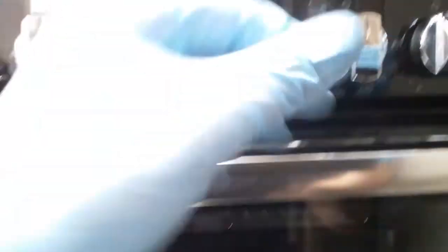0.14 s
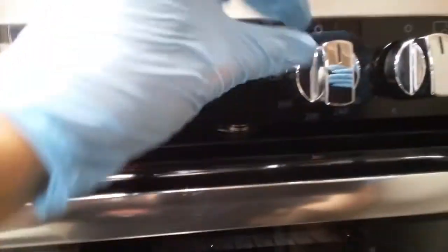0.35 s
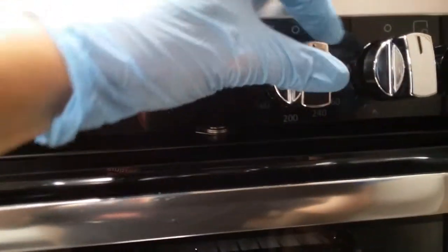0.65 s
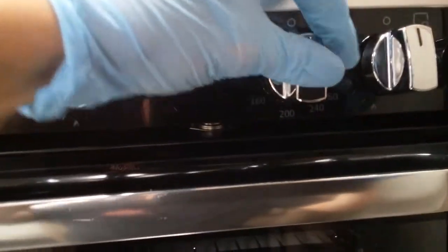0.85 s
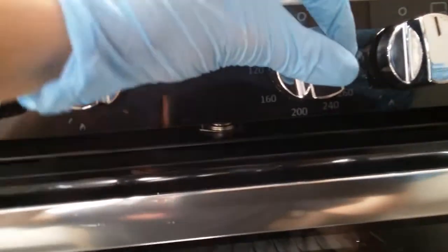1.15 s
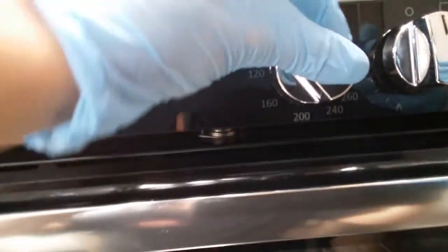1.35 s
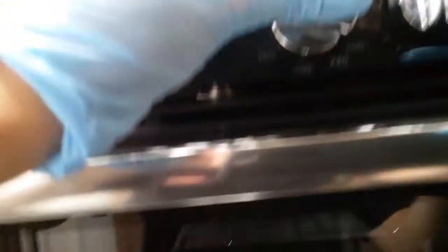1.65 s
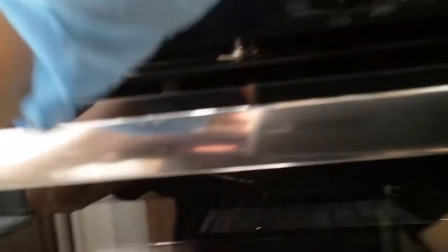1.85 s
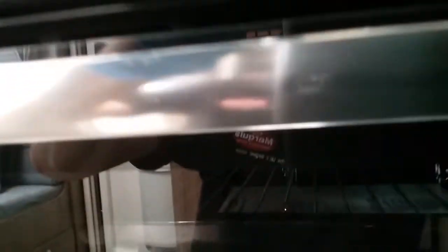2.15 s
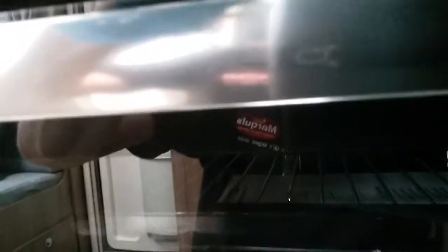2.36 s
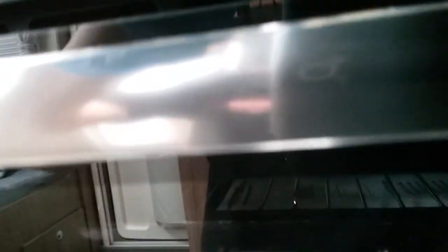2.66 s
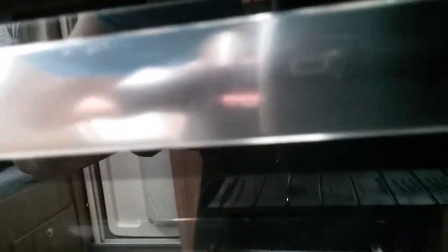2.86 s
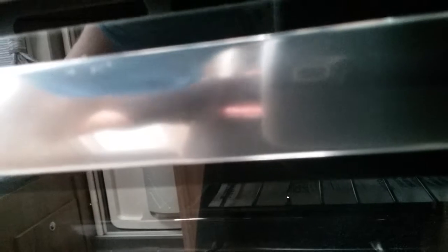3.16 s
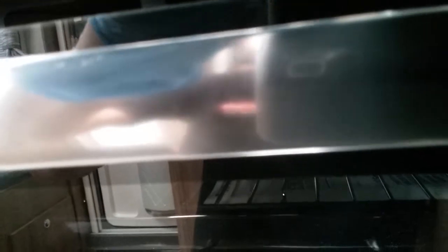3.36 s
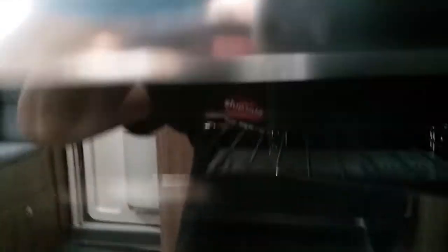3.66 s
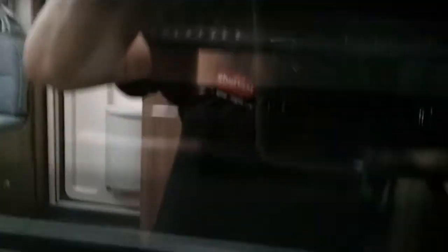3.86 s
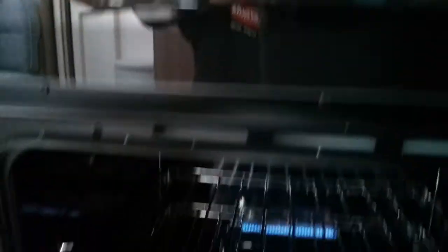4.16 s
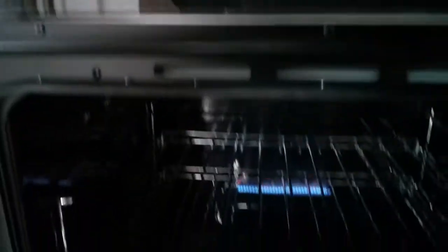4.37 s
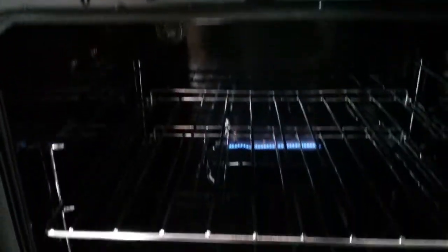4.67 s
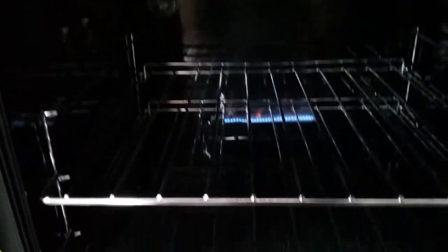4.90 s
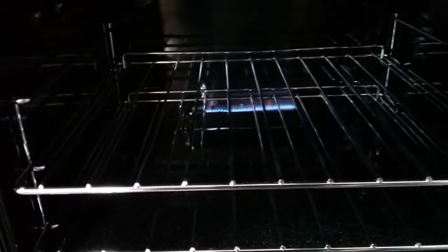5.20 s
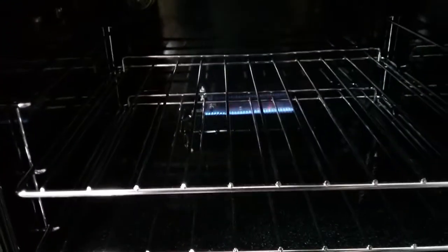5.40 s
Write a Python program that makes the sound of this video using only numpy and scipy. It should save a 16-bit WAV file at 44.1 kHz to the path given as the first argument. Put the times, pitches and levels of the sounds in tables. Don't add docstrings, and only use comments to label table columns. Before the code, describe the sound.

A close, dry phone-microphone scene in a small caravan kitchen. A quiet low outdoor wash and a very faint, extremely high steady whine lie underneath. From 0 to 1.8 seconds a gloved hand works an oven knob: small plastic ticks, fingertip taps, soft rubber rubbing, a faint squeak, and a strongest click with a dull panel knock near 0.93. Small trim pings come at 1.6 and 1.73, then near quiet with two faint ticks. From 2.75 to 3.5 five loud, bright igniter snaps, about 0.18 apart, the second doubled, ring briefly in the steel box, with soft gas pops after the first three. The burner catches around 3.1; its low, hollow, fluttering roar and thin hiss grow, opening out as the door drops near 3.8, with a slight scuff at 4.0. Irregular tiny metal ticks crackle over it until a rack clacks at 5.47.

```python
import sys
import numpy as np
from scipy import signal
from scipy.fft import rfft, irfft, next_fast_len
from scipy.io import wavfile
from scipy.ndimage import uniform_filter1d

SR = 44100
rng = np.random.default_rng(int(sys.argv[2]) if len(sys.argv) > 2 else 0)


def dump_mix(stems):
    frames = np.atleast_2d(stems).T
    limited = np.clip(frames, -1, 1)
    pcm = np.round(limited * 32767).astype(np.int16)
    wavfile.write(sys.argv[1], SR, pcm)


def decibels_to_gain(level_db):
    exponent = np.asarray(level_db, float) / 20
    return 10 ** exponent


N = 244314
TIME = np.arange(N) / SR

SPARK_TIMES = [
    2.7561,
    2.9366,
    2.9490,
    3.1150,
    3.2918,
    3.4690,
]
# peak level/dB, decay factor, likeness to the echo before (0-1), gain below 4 kHz/dB
SPARKS = [
    (-8, 1.1, 0.1, -0.5),
    (-12.5, 0.91, 1, -3.5),
    (-14, 1.14, 0.25, 1.5),
    (-8, 1.14, 0, 0.5),
    (-8, 0.93, 0.27, -2.5),
    (-6, 0.88, 1, -2),
]
# f/Hz, level/dB
SPARK_COLOUR = [(300, -26.5), (800, -8.5), (1500, -9.5), (2200, -5), (3200, -4.5), (4300, -6), (4900, -4.5),
                (5700, 0.5), (7000, 3), (9000, 4.5), (11000, 4.5), (13500, 3.5), (15500, 4)]
# f/Hz, t60/s
STEEL_BOX = [(500, 0.18), (1300, 0.13), (3500, 0.14), (6200, 0.12), (9000, 0.11), (16000, 0.1)]
# f/Hz, level/dB, t60/s
SHELF = [(2850, -15, .32), (3950, -16, .15), (4200, -18, .2), (4700, -9, .09), (5000, -8, .1),
         (5250, -8, .12), (5543, -8, .14), (5679, -8, .14), (5756, -9, .15), (5900, -7, .12),
         (6039, -7, .12), (6225, -2, .11), (6630, -3, .11), (6900, -5, .11), (7303, -9, .11),
         (7979, -10, .1)]
# f/Hz, level/dB, t60/s
ELECTRODE = [(4690, -15, 0.0081), (5000, 2.5, 0.026), (5500, 4.5, 0.0092), (5900, 3, 0.0087),
             (6640, -1.5, 0.018)]

# t/s, level/dB, relative boom/dB, relative crack/dB
POPS = [
    (2.7598, -29.5, 1, -1),
    (2.9398, -25, 5, 9),
    (3.1195, -29.5, 11, 10),
    (3.146, -36, 11, 10),
]
# f/Hz, level/dB, t60/s
POP_BOX = [(72, -19.5, 0.31), (195, 2, 0.019), (832, 2.5, 0.059), (968, -7, 0.06), (1316, 0, 0.014),
           (2150, -4, 0.083)]

# t/s, roar level/dB
FLAME = [(3.1, -56.5), (3.25, -55), (3.5, -50), (3.7, -47), (3.85, -50.5), (4.0, -49), (4.15, -51),
         (4.25, -48), (4.9, -45.5), (5.3, -45), (5.54, -47.5)]
# f/Hz, width/Hz, level/dB
OVEN_AIR = [(270, 15, -4), (423, 35, -7), (523, 63, -5.5), (633, 17.6, -0.5), (767.5, 17, 2),
            (840, 37, -3.5), (989.5, 19, -0.5), (1136, 31, -4), (1377, 39, -5.5)]
# f/Hz, level/dB
FLAME_BODY = [(100, 2), (200, 3), (600, -6.5), (1050, -11.5), (1200, -21.5), (1500, -23.5), (3000, -35.5)]
# f/Hz, level/dB
FLAME_HISS = [(1000, -61), (1500, 12.5), (2300, 4), (3000, 1), (5000, -4), (9000, -50), (16000, -2)]
# t/s, relative rumble level/dB, width/s
GUSTS = [
    (3.1, 0, .08),
    (3.55, -1, .12),
    (4.23, -7, 0.052),
    (4.55, -7, .1),
    (4.9, -2, 0.21),
    (5.27, -18, 0.05),
]

# t/s, peak level/dB, treble tilt/dB
CREAKS = [(3.5888, -35, 10), (3.6664, -42, -3), (3.7185, -47, -3), (3.7457, -41, 4), (3.9639, -41.5, 5),
          (4.0118, -51, 2), (4.0262, -39.5, 5), (4.051, -51, 4), (4.0767, -41.5, 1), (4.194, -42, 1.5),
          (4.2134, -39, 4), (4.292, -40.5, -2), (4.368, -43, -12), (4.3905, -39, 4), (4.451, -40.5, -2),
          (4.5168, -35.5, -2), (4.5645, -45, -1), (4.6199, -36.5, -9), (4.7387, -40, 6), (4.755, -39, -4),
          (4.791, -38.5, -1), (4.8309, -43, -3), (4.9133, -39.5, 3), (4.9601, -41.5, .4),
          (5.0016, -37.5, 6), (5.0948, -40.5, 2), (5.239, -39.5, 4), (5.255, -38, 5), (5.335, -42.5, -4),
          (5.4456, -36.5, 5)]
# f/Hz, width/Hz, level/dB
SHEET = [(1780, 450, -11), (2140, 330, -0.5), (2860, 70, -8), (3630, 73, -5.5), (4670, 87, -2.5),
         (5100, 200, -5.5), (5900, 150, -5), (6800, 170, -10)]

# t/s, peak level/dB, ring f/Hz, relative treble/dB
DETENTS = [(.0875, -42.5, 2050, -14), (.386, -33, 2560, -13), (.834, -53, 3130, -6), (.847, -46, 2150, -14),
           (.8932, -32.5, 2620, -20), (.9195, -27.5, 6200, -4), (.9267, -20, 5970, -12),
           (.9327, -28.5, 5900, -3), (1.2304, -38, 3120, -21), (1.2707, -34, 3130, -34),
           (1.45, -52.5, 5830, -17), (1.752, -39, 5300, -14), (2.3755, -53, 2410, -3),
           (2.615, -48, 2040, -9)]
# t/s, peak level/dB, ring f/Hz, relative treble/dB
TAPS = [(.034, -47, 2960, -5), (.057, -41.5, 6230, -25), (.079, -35.5, 3160, -19), (.118, -46, 5900, -20),
        (.2536, -43, 5060, -32), (.259, -40.5, 4950, -27), (.684, -53, 5500, -2), (.773, -44, 5520, -33),
        (1.324, -54, 5770, -21), (1.562, -52, 7500, -4), (5.497, -37, 6000, -20), (5.514, -39, 5900, -14),
        (1.205, -58, 5000, -14), (1.759, -51, 7500, -10)]
# t/s, peak level/dB, ring f/Hz, relative treble/dB
PINGS = [
    (.047, -56, 3240, -22),
    (1.6004, -35.5, 2950, -26),
    (1.729, -32.5, 2280, -26),
]
# t/s, peak level/dB, ring f/Hz, relative treble/dB
RACK = [
    (5.466, -22.5, 2850, -29),
    (5.473, -28, 3070, -29),
]
# table, relative thud/dB, relative ring/dB, share of rattling tail
TICK_KINDS = [
    (DETENTS, -0.58, -17, 0.21),
    (TAPS, -15.5, -23, 0.15),
    (PINGS, -6, -9.5, 0.16),
    (RACK, -9, -17.5, .25),
]
# t/s, f/Hz, level/dB, t60/s
HUMS = [
    (.35, 897, -56, 0.29),
    (.512, 252.2, -50, 0.53),
    (.925, 980, -39, .08),
    (.94, 270, -42.5, 0.22),
    (1.232, 3160, -55, .05),
    (1.272, 3220, -58, 0.066),
    (1.603, 3020, -56, 0.072),
]
# t/s, level/dB, t60 factor
THUDS = [
    (.39, -59.5, 1.7),
    (.927, -43, 1.27),
    (0.944, -44.5, 0.61),
    (0.966, -51.5, 0.29),
    (1.731, -48, 0.31),
    (.98, -56, 0.97),
]
# f/Hz, level/dB, t60/s
PANEL = [(66, -4, 0.23), (150, -1, 0.16), (260.7, 4, 0.19), (499, 1, 0.098), (675, -5, .08), (960, 1, 0.11)]

# t of firmest grip/s, level/dB, rise/s, fall/s
RUBS = [
    (.08, -66, 0.073, 0.03),
    (.37, -64, 0.1, 0.056),
    (.905, -60.5, 0.014, 0.032),
    (1.70, -58.5, 0.042, .04),
    (1.76, -64, .03, 0.05),
    (5.52, -62, 0.018, 0.016),
]
# start/s, end/s, f/Hz, level/dB
SQUEAKS = [
    (0.69, 0.734, 3400, -64.5),
    (1.51, 1.563, 6000, -82),
]
# level/dB, f/Hz, width/Hz
SCUFF = (-60, 2700, 1800)

# f/Hz, level/dB
ROOM = [(25, -38), (45, -6.5), (65, 2), (100, -1.5), (160, -7), (250, -8.5), (350, -17), (1000, -18.5),
        (1600, -27), (2500, -33.5), (4000, -42), (8000, -43.5), (13500, -40.5), (15000, -43.5)]
# f/Hz, width/Hz, level/dB
PORT = [(6200, 570, 14.5), (16200, 1400, 8)]

DOOR_S, DOOR_SWING_S = 3.82, 0.016
NOTE_SHUT_DB, NOTE_OPEN_DB, NOTE_FOLLOW = 7, -.5, 0.52
CALM_DB = -24
JET_DB, JET_RISE_S, JET_FULL_S, JET_FADE_DB, JET_FADE_S = -63, 0.56, 3.84, -7.5, .8
JET_FOLLOW, LUMP_DB = .8, 2
SCUFF_S, SCUFF_RISE_S, SCUFF_FALL_S = 4.025, .022, .03
WHINE_HZ, WHINE_DB = 14020.5, -57
ROOM_DB, ROOM_START_DB, ROOM_SETTLE_S = -56.5, -4.5, 0.4
DUCK_DB, LOUD_DB, DUCK_S = -3.5, -28, 0.27


def igniter():
    out, scatter = np.zeros(N), np.zeros(SR // 3)
    for s, (db, stretch, likeness, low_db) in zip(SPARK_TIMES, SPARKS):
        likeness = np.clip(likeness, 0, 1)
        fresh = rng.standard_normal(len(scatter))
        scatter = likeness * scatter + np.sqrt(1 - likeness ** 2) * fresh
        echo = oven_echo(np.clip(stretch, .3, 2), scatter)
        spark = colour(echo, lambda hz: read([(3800, low_db), (4600, 0.016)], hz))
        add(out, s, decibels_to_gain(db - 8) * spark)
    return out


def oven_echo(stretch, scatter):
    t, out = np.arange(len(scatter)) / SR, 0
    hz = np.fft.rfftfreq(len(scatter), 1 / SR)
    edges = np.log([f for f, _ in STEEL_BOX])
    for k, (_, t60) in enumerate(STEEL_BOX):
        share = np.interp(np.log(hz + 1), edges, np.arange(len(edges)) == k)
        oven = decibels_to_gain(-60 * t / (t60 * stretch))
        kitchen = decibels_to_gain(-17.5 - 60 * t / (1.6 * t60))
        out = out + irfft(rfft(scatter) * share, len(t)) * (oven + kitchen)
    out = out * (1 + 0.14 * decibels_to_gain(-60 * t / 0.038))
    out = colour(out, lambda f: read(SPARK_COLOUR, f))
    out = 19 * out / np.linalg.norm(out)
    return out + decibels_to_gain(-22.5) * modes(SHELF, t, stretch) + decibels_to_gain(-15.0) * modes(ELECTRODE, t, 0.8)


def pops():
    out, t = np.zeros(N), np.arange(8000) / SR
    for s, db, boom_db, crack_db in POPS:
        noise = rng.standard_normal(len(t))
        crack = noise * decibels_to_gain(crack_db - 60 * t / 0.013)
        crack = crack + evened(band(noise, 480, 1000)) * decibels_to_gain(-6.5 - 60 * t / 0.035)
        boom = decibels_to_gain(boom_db) * strike(POP_BOX[:2], 0.62, size=len(t))
        box = strike(POP_BOX[2:], 0.7, size=len(t))
        add(out, s, decibels_to_gain(db - 6.0) * (boom + box + crack))
    return out


def burner():
    burning = TIME - FLAME[0][0]
    lit = np.clip(burning / 0.05, 0, 1)
    roar_db = np.interp(TIME, *np.transpose(FLAME))
    swell_db = roar_db - uniform_filter1d(roar_db, size=SR // 2)
    door = 1 / (1 + np.exp((DOOR_S - TIME) / DOOR_SWING_S))
    note_db = NOTE_SHUT_DB + (NOTE_OPEN_DB - NOTE_SHUT_DB) * door + NOTE_FOLLOW * swell_db
    draught = decibels_to_gain(CALM_DB) + sum(decibels_to_gain(db) * hump(s, width, width) for s, db, width in GUSTS)
    jet_fade_db = JET_FADE_DB * np.clip((TIME - JET_FULL_S) / JET_FADE_S, 0, 1)
    jet_rise = np.clip(burning / JET_RISE_S, 0, 1) ** 2
    jet = jet_rise * decibels_to_gain(JET_DB + JET_FOLLOW * swell_db + jet_fade_db)
    flutter = decibels_to_gain(1.2 * evened(uniform_filter1d(rng.standard_normal(N), size=500)))
    roar = steady(lambda hz: read(FLAME_BODY, hz) + peaks_db(OVEN_AIR, hz, valley_db=-17.5))
    note = steady(lambda hz: 2 * peaks_db([(216.7, 55.5, 0.0038)], hz, valley_db=-40.5))
    rumble = steady(lambda hz: 2 * peaks_db([(61, 19, 0)], hz, valley_db=-33.0))
    hiss = air(lambda hz: read(FLAME_HISS, hz) + peaks_db(SHEET, hz, valley_db=-10),
               patchy_db=1, flicker_db=2)
    slow = uniform_filter1d(uniform_filter1d(rng.standard_normal(N), size=2500), size=2500)
    lumps_db = LUMP_DB * door * evened(slow)
    low = decibels_to_gain(0.42 * lumps_db) * roar + decibels_to_gain(note_db + lumps_db - 2.0) * note + draught * rumble
    return lit * decibels_to_gain(roar_db) * flutter * low + jet * hiss


def warming():
    dull, bright, t = np.zeros(N), np.zeros(N), np.arange(3000) / SR
    faint = [(3.6 + 1.9 * a, -55 + 9 * b, -3) for a, b in rng.random((90, 2))]
    for s, db, tilt_db in list(CREAKS) + faint:
        scrape = rng.standard_normal(len(t)) * decibels_to_gain(db - 9)
        add(dull, s, scrape * decibels_to_gain(-60 * t / 0.057))
        add(bright, s, scrape * decibels_to_gain(tilt_db - 60 * t / 0.017))
    span = [(900, -24.0), (1700, 3.0), (7000, 2.5), (8500, -26)]
    metal = colour(dull, lambda hz: peaks_db(SHEET, hz, valley_db=-10.5) + read(span, hz))
    edge = [(2500, -33.0), (4500, -14), (9000, -10.5), (16000, -8)]
    return metal + colour(bright, lambda hz: read(edge, hz))


def knob():
    out, t = np.zeros(N), np.arange(12000) / SR
    quick, slow = decibels_to_gain(-60 * t / 0.0041), decibels_to_gain(-60 * t / 0.096)
    for table, thud_db, ring_db, tail in TICK_KINDS:
        for s, db, hz, treble_db in table:
            burst, edge, low = rng.standard_normal((len(t), 3)).T
            body = evened(band(band(burst, hz, 3500), 2500, 6600))
            treble = evened(band(band(edge, 13400, 10000), 14000, 9000))
            snap = (quick + tail * slow) * (body + decibels_to_gain(treble_db + 9.5) * treble)
            ring = band(edge * decibels_to_gain(-60 * t / 0.03), hz, 200)
            ring = decibels_to_gain(ring_db + 13.5) * ring / abs(ring).max()
            knock = evened(band(band(low, 350, 940), 430, 1900))
            thud = knock * decibels_to_gain(thud_db - 4.5) * (quick + 0.89 * slow)
            add(out, s, decibels_to_gain(db - 11.5) * (snap + ring + thud))
    for s, *mode in HUMS:
        add(out, s, np.minimum(t / .004, 1) * modes([mode], t, 1))
    for s, db, stretch in THUDS:
        stretch = max(stretch, .1)
        rattle = evened(band(rng.standard_normal(len(t)), 350, 300)) * decibels_to_gain(-60 * t / (0.22 * stretch))
        add(out, s, decibels_to_gain(db) * (strike(PANEL, stretch, size=len(t)) + 0.92 * rattle))
    return out


def glove():
    grain = [(1500, -2), (4200, -4), (5000, -2.5), (8000, -5), (10000, -11), (16000, -4)]
    rub = air(lambda hz: read(grain, hz), patchy_db=-3.5, flicker_db=-4.5)
    out = rub * sum(decibels_to_gain(db) * hump(s, rise, fall) for s, db, rise, fall in RUBS)
    db, hz, width = SCUFF
    seal = evened(band(band(rub, hz, width), hz, width))
    out += decibels_to_gain(db) * hump(SCUFF_S, SCUFF_RISE_S, SCUFF_FALL_S) * seal
    for start, end, hz, db in SQUEAKS:
        t = np.arange(0, end - start, 1 / SR)
        fade = decibels_to_gain(db - 170 * t) * np.minimum(t / 0.0036, 1)
        add(out, start, fade * np.sin(2 * np.pi * hz * t))
    return out


def room():
    wash = steady(lambda hz: read(ROOM, hz))
    whine = decibels_to_gain(WHINE_DB) * np.sqrt(2) * np.sin(2 * np.pi * WHINE_HZ * TIME)
    return wash * decibels_to_gain(ROOM_DB + ROOM_START_DB * np.exp(-TIME / ROOM_SETTLE_S) + 3.5) + whine


def modes(table, t, stretch):
    return sum(decibels_to_gain(db - 60 * t / (t60 * stretch)) * np.sin(2 * np.pi * f * t) for f, db, t60 in table)


def strike(table, stretch, size):
    t, out = np.arange(size) / SR, 0
    odds = rng.uniform(-1.0, 1, (len(table), 2))
    for (f, db, t60), (a, b) in zip(table, odds):
        decay = decibels_to_gain(db + 3 * a - 60 * t / (t60 * stretch))
        out = out + decay * np.sin(2 * np.pi * f * (1 + .02 * b) * t)
    return out


def air(gain_db, patchy_db, flicker_db):
    frames, hz = N // 256 + 5, np.fft.rfftfreq(1024, 1 / SR)
    a, b, patches = rng.standard_normal((frames, 513, 3)).T
    patches = evened(uniform_filter1d(uniform_filter1d(patches, size=10, axis=0), size=12, axis=1))
    flicker = evened(uniform_filter1d(rng.standard_normal(frames), size=5))
    z = (a + 1j * b) * decibels_to_gain(gain_db(hz)[:, None] + patchy_db * patches + flicker_db * flicker)
    return evened(signal.istft(z, nperseg=1024, noverlap=768)[1][:N])


def steady(gain_db):
    gain = decibels_to_gain(gain_db(np.fft.rfftfreq(N, 1 / SR)))
    return evened(irfft(rfft(rng.standard_normal(N)) * gain, N))


def colour(x, gain_db):
    size = next_fast_len(len(x) + 4096)
    hz = abs(np.fft.fftfreq(4096, 1 / SR))
    log_gain = np.log(decibels_to_gain(np.maximum(gain_db(hz), -100)))
    taps = np.fft.ifft(np.exp(np.conj(signal.hilbert(log_gain)))).real[:2048]
    return irfft(rfft(x, size) * rfft(taps, size), size)[:len(x)]


def band(x, hz, width):
    r = np.exp(-np.pi * width / SR)
    return signal.lfilter([1, 0, -1], [1, -2 * r * np.cos(2 * np.pi * hz / SR), r * r], x)


def peaks_db(peaks, hz, valley_db):
    power = sum(decibels_to_gain(2 * db) / (1 + (2 * (hz - f) / w) ** 2) for f, w, db in peaks)
    return 10 * np.log10(decibels_to_gain(2 * valley_db) + power)


def read(points, hz):
    f, value = np.transpose(points)
    return np.interp(np.log(hz + 1), np.log(f + 1), value)


def hump(s, rise, fall):
    return np.exp(-((TIME - s) / np.where(TIME < s, rise, fall)) ** 2)


def evened(x):
    return x / np.sqrt(np.mean(x ** 2) + 1e-20)


def add(mix, s, sound):
    part = mix[round(s * SR):][:len(sound)]
    part += sound[:len(part)]


def scene():
    return (igniter() + pops() + knob() + glove() + warming() + burner() + room())[None]


def ducked(x):
    r = np.exp(-1 / (DUCK_S * SR))
    memory = signal.lfilter([(1 - r) ** 2], [1, -2 * r, r * r], x ** 2)
    return x * decibels_to_gain(DUCK_DB * memory / decibels_to_gain(2 * LOUD_DB))


def top_cut(x):
    return signal.sosfilt(signal.butter(12, 17110, fs=SR, output="sos"), x)


def record(dry):
    limits = [(20, -34), (45, -10.0), (60, 1.0), (15700, 0), (16000, -22.0), (16800, -59.0), (17300, -64)]
    port = colour(dry[0], lambda hz: peaks_db(PORT, hz, valley_db=0) + read(limits, hz))
    return top_cut(ducked(port)[None])


dry = scene()
out = record(dry)
dump_mix(out)
```